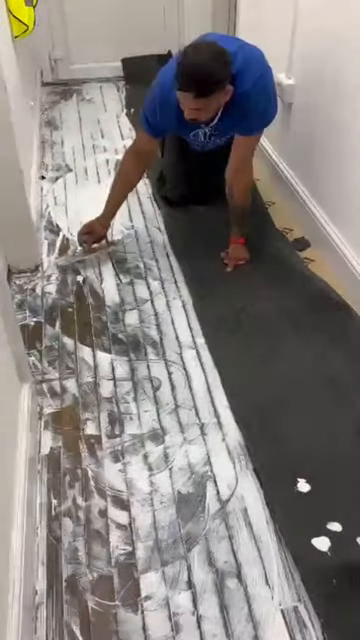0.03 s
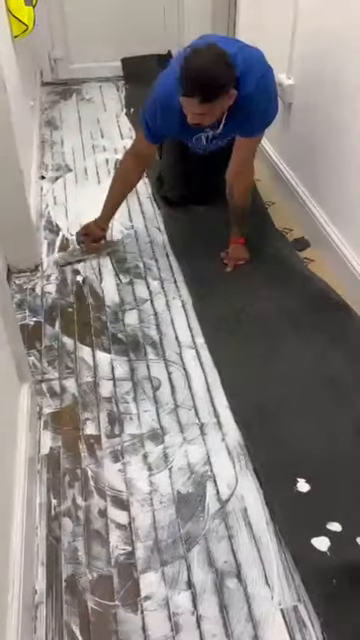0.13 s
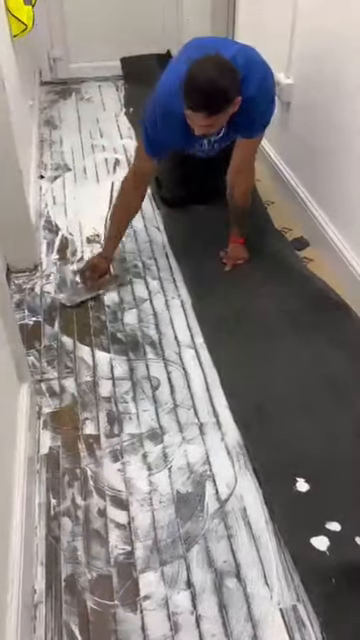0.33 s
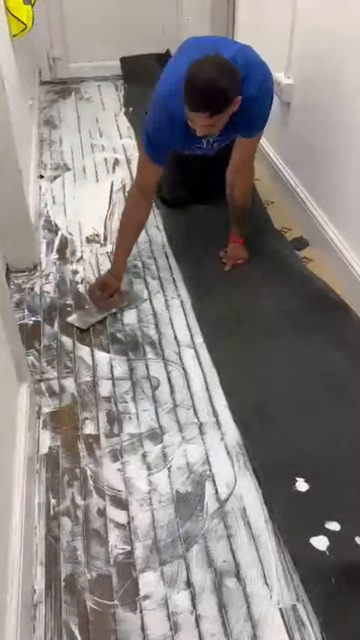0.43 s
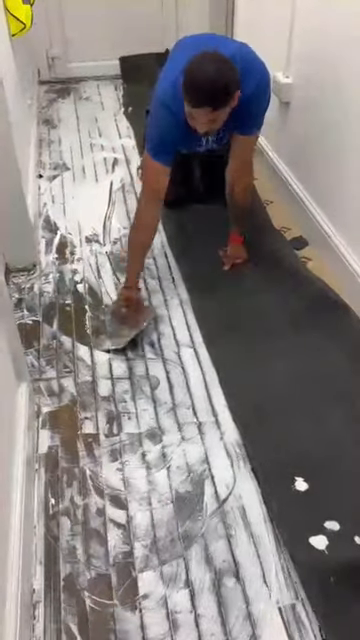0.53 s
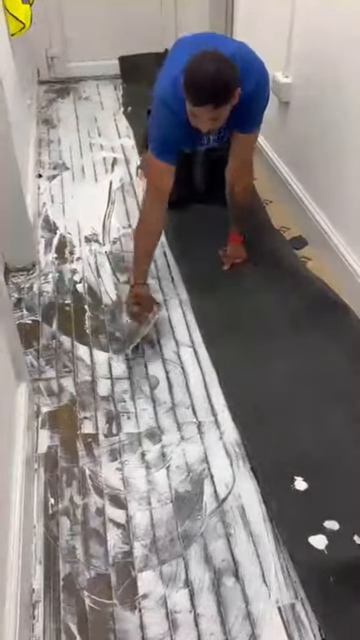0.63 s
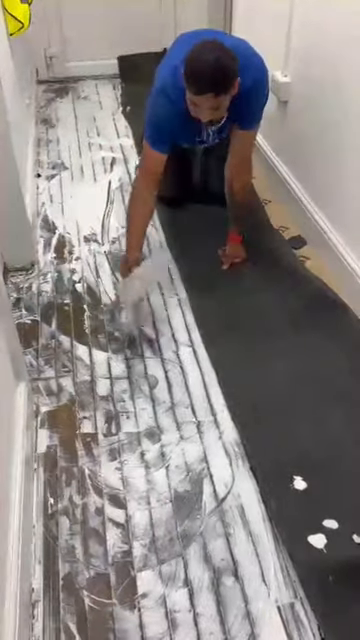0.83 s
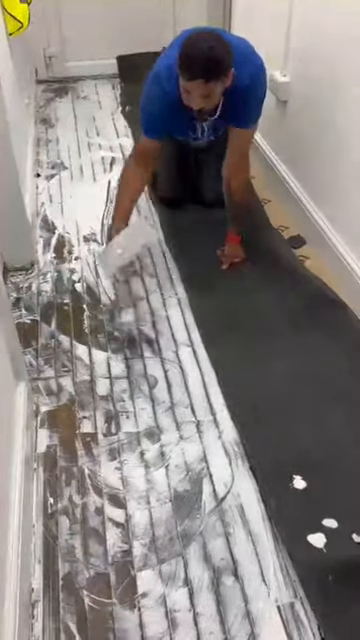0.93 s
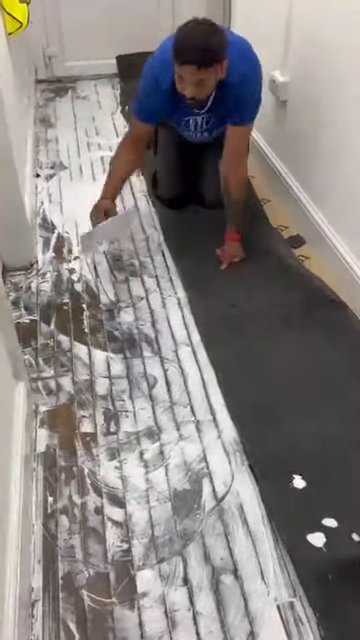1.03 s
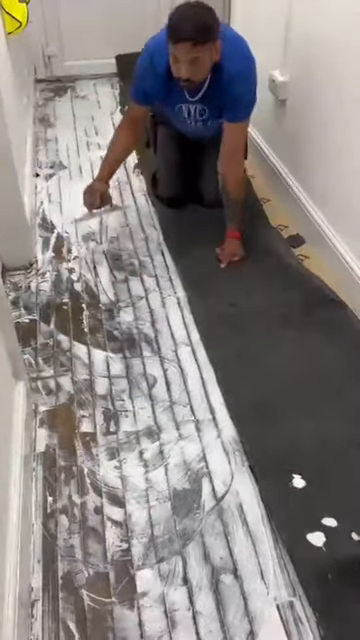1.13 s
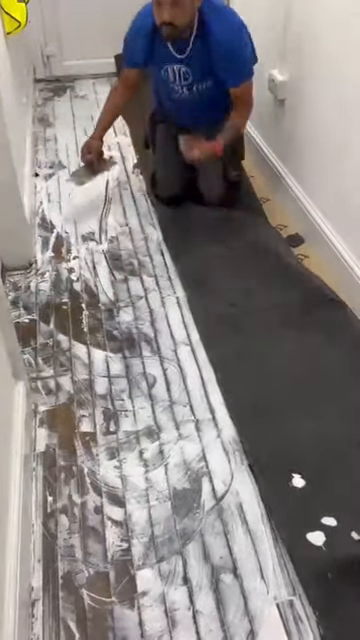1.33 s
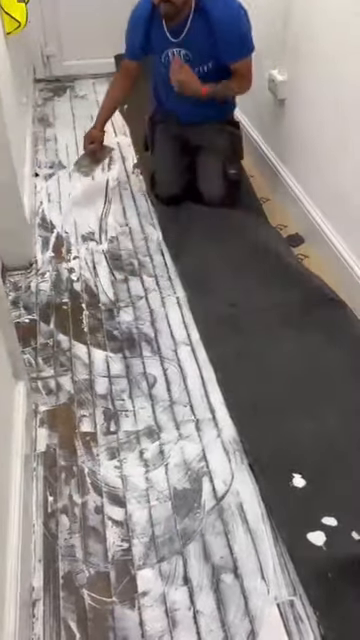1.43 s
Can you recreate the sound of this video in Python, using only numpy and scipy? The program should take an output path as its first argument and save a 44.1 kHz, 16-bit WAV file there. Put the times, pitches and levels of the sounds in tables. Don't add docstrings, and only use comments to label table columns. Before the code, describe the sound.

A steel trowel taps down with a soft thud, then drags in one rough, hissing scrape over sticky boards; afterwards quiet knocks and cloth rustle, in a small echoing corridor, heard close on a phone in stereo.

```python
import sys
import numpy as np
from scipy import signal
from scipy.fft import rfft, irfft, next_fast_len
from scipy.io import wavfile
from scipy.ndimage import uniform_filter1d, map_coordinates

SR = 44100
rng = np.random.default_rng(int(sys.argv[2]) if len(sys.argv) > 2 else 0)


def voltage_ratio(level):
    return 10 ** (np.asarray(level, float) / 20)


def pcm_store(signal):
    levels = np.round(np.clip(np.atleast_2d(signal), -1, 1) * 32767)
    wavfile.write(sys.argv[1], SR, levels.astype(np.int16).T)


N = 66150

# time in seconds, pressure in dB, extra hiss from speed in dB,
# drive of the boards in dB, ring of the blade in dB.
STROKE = [
    (0.292, -46, 0, 2.5, -37.5),
    (0.346, -37.5, 3.5, -5, 3),
    (0.38, -40, 7.5, 0, 0.5),
    (0.422, -38.5, -11.5, -2, 11),
    (0.473, -33.5, 5.5, 2, 0.5),
    (0.542, -34, 0.5, -1.5, 5),
    (0.579, -37, 8.5, 4, -24),
    (0.644, -32, 8, -9.5, 7.5),
    (0.718, -51.5, -8, 9.5, 5.5),
]
# pitch in Hz, width in Hz, level in dB.
BOARD_MODES = [(247, 82, -11), (306, 40, -3.5), (340, 31.7, -1.5), (570, 31, -1), (670.4, 47, 1),
               (790, 165, -5), (960, 69, -17), (1375, 170, -0.5), (1515, 139, -2), (2185, 320, -10)]
# frequency in Hz, level in dB per Hz.
SMEAR_SPECTRUM = [(300, -5.5), (800, 1.5), (2000, -5), (2900, -11), (5000, -9), (7000, -37), (9000, -53),
                  (11800, -53)]
# time in seconds, loss in dB, half length in seconds.
SKIPS = [
    (0.34, 5.5, 0.0035),
    (0.432, 2.5, 0.0091),
    (0.571, 9, 0.0047),
]
# start in seconds, level in dB, time to fade 60 dB in seconds,
# brightness from 0 to 1.
TICKS = [
    (0.2, -36.5, 0.047, 0.58),
    (0.21, -45, 0.0097, 1),
    (0.237, -42.5, 0.088, 0.52),
    (0.344, -37.5, 0.04, 0.2),
    (0.065, -53.5, 0.073, 1),
    (0.986, -56, 0.021, 0.3),
    (1.118, -69, 0.063, 0.7),
    (1.209, -42.5, 0.066, 0.35),
    (1.318, -49, 0.025, 0.1),
]
KNOCK_STARTS = [.205, .203, .246, .237, .237, .3455, .975, .97, 1.036, 1.04, 1.208, 1.317, 1.459, .262, .32,
                .431, .466, .489, .507, .535, .567, .568, .845, .9, 1.163, 1.185, 1.203, 1.305, 1.355,
                1.385, .97, .985, .345, .575]
# level in dB, pitch in Hz, rise in seconds,
# time to fade 60 dB in seconds.
KNOCKS = [(-25.5, 189.4, 0.0089, 0.17), (-30, 350, 0.0057, 0.11), (-16, 172.2, 0.0078, 0.11),
          (-27, 270, 0.0048, 0.14), (-35, 530, 0.00031, 0.049), (-19, 659, 0.0022, 0.037),
          (-34, 390, 0.014, 0.14), (-30.5, 330, 0.012, 0.097), (-31.5, 123, 0.0067, 0.14),
          (-34, 198, 0.0049, 0.12), (-48, 850, 0.0066, 0.049), (-45, 825, 0.0017, 0.058),
          (-35, 674, 0.0011, 0.023), (-22, 186, 0.0057, 0.095), (-24.5, 690, 0.0024, 0.033),
          (-18.5, 490, 0.0035, .04), (-16, 352.5, 0.0027, 0.062), (-29, 370, .003, 0.019),
          (-15, 296, 0.0023, 0.046), (-11.5, 640, 0.0014, 0.025), (-26.5, 290, .002, 0.02),
          (-16.5, 615, 0.0014, 0.016), (-39.5, 180, .012, 0.32), (-35.5, 169, 0.013, 0.25),
          (-34, 240, 0.0025, 0.094), (-33.5, 105, 0.0072, 0.13), (-35.5, 232, 0.0034, 0.15),
          (-37, 204, 0.0065, 0.096), (-38, 190, .005, 0.063), (-44, 270, 0.028, 0.42),
          (-47, 590, .004, .05), (-30, 163.4, 0.0094, 0.14), (-28, 190.6, 0.0063, .1),
          (-29, 198, 0.0068, 0.106)]
CATCH_TIMES = [.378, .44, .474, .46, .52, .525, .538, .61, .635, .645, .65, .655, .73, .72, .99, 1.125,
               1.215, .355, .648, .65, .445, 1.325, .075, .605, .705, .52, .375, .204, 1.03, 1.235, .44]
# level in dB, half length in seconds, pitch in Hz, width in Hz.
CATCHES = [(-50.5, 0.017, 5700, 1900), (-38.5, 0.028, 650, 76), (-29.5, 0.0047, 460, 37),
           (-63.5, 0.056, 9200, 1400), (-38, 0.023, 1330, 40), (-75, 0.0073, 4000, 3500),
           (-43, 0.013, 1760, 94), (-38.5, 0.029, 652, 30), (-33.5, 0.02, 985, 67),
           (-63, 0.0072, 3500, 3500), (-54, 0.019, 1950, 120), (-32.5, 0.015, 391, 60),
           (-56, 0.014, 315, 40), (-54.5, 0.056, 2400, 460), (-52.5, 0.018, 600, 190),
           (-63, 0.017, 3700, 230), (-58.5, 0.013, 3200, 1100), (-50, 0.047, 2270, 850),
           (-53, 0.011, 4700, 170), (-36.5, 0.0058, 2100, 100), (-44.5, .02, 1230, 680),
           (-70, 0.0072, 2700, 1600), (-62.5, 0.018, 3700, 3600), (-33.5, 0.027, 340, 26),
           (-37.5, 0.022, 340.6, 29), (-52, 0.042, 4900, 1100), (-52.5, 0.0091, 5150, 980),
           (-53, 0.0034, 3600, 2400), (-50, 0.032, 280, 92), (-60.5, .015, 3600, 800),
           (-40, 0.016, 354, 47)]
# time in seconds, level in dB.
SHUFFLE = [
    [(0, -53.5), (.06, -61.5), (.12, -64.5), (.19, -88)],
    [(.8, -64.5), (.95, -67), (1.12, -63), (1.18, -64), (1.22, -60), (1.33, -64.5), (1.4, -85.5),
     (1.5, -62.5)],
]
# frequency in Hz, level in dB per Hz.
CLOTH_SPECTRUM = [(200, 1.5), (500, 1.5), (1500, -11.5), (4000, -6.5), (8000, -25), (12000, -15.5)]
# pitch in Hz, width in Hz, level in dB.
SQUEAK = (2460, 640, -60)
# frequency in Hz, time to fade 60 dB in seconds.
CORRIDOR_FADE = [(150, 0.38), (500, 0.49), (2000, 0.39), (8000, 0.14)]
# frequency in Hz, level in dB per Hz.
AIR_SPECTRUM = [(20, -30), (40, -2), (70, 0), (220, -16), (450, -16), (1500, -23), (4500, -28.5),
                (11800, -46)]
# pitch in Hz, width in Hz, level in dB.
AIR_MODES = [(57, 20, -1), (125.6, 25.3, -1.5), (168.2, 23.3, -1.5), (227.7, 19.4, -0.5), (340.1, 8.7, 1.5),
             (682, 70, -14.5)]
# frequency in Hz, likeness from 0 to 1.
PORT_LIKENESS = [(120, .9995), (300, 1), (700, 0.76), (1500, 0.68), (3000, 0.33), (6000, 0.69), (8500, 1),
                 (11000, 0.55)]
# frequency in Hz, lag in radians.
PORT_LAG = [(0, 0), (200, 0), (450, .25), (1100, 1.2), (2500, 2.7), (3200, 3.1), (4900, 2.35), (6200, 3.3),
            (8100, 6.28), (10400, 9.4), (12000, 10)]
# frequency in Hz, left minus right in dB.
PORT_LEAN = [(150, 0), (340, 2.5), (700, 5), (1200, 5), (2000, 2.5), (3500, -1.5), (6300, -2), (9000, 0)]
# part (0 for mid, 1 for side), lower edge in Hz, upper edge in
# Hz.
LOST_BANDS = [(0, 5500, 6900), (0, 9450, 11050), (0, 11350, 11500), (0, 11700, 13000), (1, 7150, 9000),
              (1, 11500, 13000)]

SQUEAK_START_S = 1.44


def unit(x):
    return x / np.sqrt(np.mean(x ** 2) + 1e-20)


def along(points, hz):
    f, v = np.transpose(points)
    return np.interp(np.log(hz + 1), np.log(f + 1), v)


def wobble(rate):
    return map_coordinates(rng.standard_normal(200), [np.arange(N) * rate / SR])


def filtered(x, response):
    m = next_fast_len(N + SR // 2)
    return irfft(rfft(x, m) * response(np.fft.rfftfreq(m, 1 / SR)), m)[..., :N]


def resonant(x, peaks):
    def response(f):
        total = 0
        for k, (centre, width, db) in enumerate(peaks):
            damping = 1j * f * width
            total = total + (-1) ** k * voltage_ratio(db) * damping / (centre * centre - f * f + damping)
        return total
    return filtered(x, response)


def coloured(x, spectrum):
    return unit(filtered(x, lambda hz: voltage_ratio(along(spectrum, hz))))


def patchy(x, patchy_db):
    z = signal.stft(x, nperseg=512)[2]
    field = uniform_filter1d(rng.standard_normal(z.shape), size=5, axis=0)
    field = uniform_filter1d(field, size=8, axis=1)
    return signal.istft(z * voltage_ratio(patchy_db * unit(field)), nperseg=512)[1][:N]


def blade_slips():
    slips_per_s, spread_db = 1500, 2
    chance, sign, size = rng.random((3, N))
    slips = (chance < slips_per_s / SR) * np.sign(sign - .5)
    slips = slips * voltage_ratio(-spread_db * np.log(size + 0.012))
    return unit(slips) + 0.74 * rng.standard_normal(N)


def trowel():
    s, press_db, speed_db, board_db, ring_db = np.transpose(STROKE)
    t = np.arange(N) / SR
    lift_s, clump_db, blade_db, hiss_db = 0.27, 2, -2, -8

    def held(v):
        return np.interp(t, s, v)

    away_s = np.abs(t - np.clip(t, s[0], s[-1]))
    touch = voltage_ratio(held(press_db) - 60 * away_s / lift_s)
    for at, loss_db, half in SKIPS:
        touch = touch * voltage_ratio(-loss_db * np.exp(-.5 * ((t - at) / half) ** 2))

    slips = blade_slips()

    def rung(rate, modes):
        return unit(resonant(slips * voltage_ratio(clump_db * wobble(rate)), modes))

    low = rung(56.56, BOARD_MODES[:3]) * voltage_ratio(held(board_db))
    mid = patchy(rung(71.0, BOARD_MODES[3:6]) * voltage_ratio(blade_db), patchy_db=1.5)
    ring = patchy(rung(79.2, BOARD_MODES[6:]), patchy_db=3.5)
    ring = ring * voltage_ratio(blade_db - 9.0 + held(ring_db))

    hiss = patchy(rng.standard_normal(N) + 0.16 * slips, patchy_db=3.5)
    hiss = coloured(hiss * voltage_ratio(3.1 * wobble(46.32)), SMEAR_SPECTRUM)
    hiss = hiss * voltage_ratio(hiss_db + held(speed_db))
    return touch * (low + mid + ring + hiss)


def ticks():
    out, t = np.zeros(N + SR), np.arange(SR // 4) / SR
    for s, db, t60, bright in TICKS:
        puff = rng.standard_normal(len(t))
        puff = bright * puff + (1 - bright) * 2 * uniform_filter1d(puff, size=9)
        out[round(s * SR):][:len(t)] += voltage_ratio(db - 60 * t / t60) * puff
    return out[:N]


def knocks():
    out, t = np.zeros(N + SR), np.arange(SR // 4) / SR
    for s, (db, hz, rise, t60) in zip(KNOCK_STARTS, KNOCKS):
        sway = 1 + 0.02 * np.sin(2 * np.pi * (25 * t + rng.random()))
        tone = np.sin(2 * np.pi * hz * np.cumsum(sway) / SR)
        envelope = voltage_ratio(db - 60 * t / t60) * (1 - np.exp(-t / rise)) ** 2
        out[round(s * SR):][:len(t)] += envelope * tone
    return out[:N]


def catches():
    t, out = np.arange(N) / SR, np.zeros(N)
    for s, (db, half, hz, width) in zip(CATCH_TIMES, CATCHES):
        swell = np.exp(-.5 * ((t - s) / half) ** 2)
        rub = unit(swell * resonant(rng.standard_normal(N), [(hz, width, 0)]))
        out += voltage_ratio(db) * rub * np.sqrt(np.mean(swell ** 2))
    return out


def shuffle():
    t, level = np.arange(N) / SR, np.zeros(N)
    for rows in SHUFFLE:
        s, db = np.transpose(rows)
        level += voltage_ratio(np.interp(t, s, db, left=-120, right=-120))
    rustle = patchy(rng.standard_normal(N), patchy_db=4.0) * voltage_ratio(3.1 * wobble(30.5))
    return voltage_ratio(7.5) * level * coloured(rustle, CLOTH_SPECTRUM)


def squeak():
    hz, width, db = SQUEAK
    once = resonant(rng.standard_normal(N), [(hz, width, 0)])
    twice = unit(resonant(once, [(hz, width, 0)]))
    return voltage_ratio(db) * (np.arange(N) / SR > SQUEAK_START_S) * twice


def corridor(x):
    wall_s = .006
    hz, t, z = signal.stft(rng.standard_normal((2, SR // 2)), SR, nperseg=256)
    fade = voltage_ratio(-60 * t / along(CORRIDOR_FADE, hz)[:, None])
    tail = signal.istft(z * fade, SR, nperseg=256)[1]
    delayed = np.pad(x, (round(wall_s * SR), 0))[None]
    return signal.fftconvolve(delayed, tail / np.linalg.norm(tail[0]), axes=1)[:, :N]


def air():
    air_db, hum_db = -53, -47
    hush = coloured(rng.standard_normal((2, N)), AIR_SPECTRUM) * voltage_ratio(air_db + 1.2 * wobble(5.7))
    hum = unit(resonant(rng.standard_normal((2, N)), AIR_MODES)) * voltage_ratio(hum_db + 0.51 * wobble(8.15))
    return hush + hum


def ports(pair):
    def blend(hz):
        turn = np.arccos(np.clip(along(PORT_LIKENESS, hz), -1, 1)) / 2
        return np.array([np.cos(turn), np.sin(turn)])

    def lean_and_lag(hz):
        lag = np.interp(hz, *np.transpose(PORT_LAG))
        left = voltage_ratio(along(PORT_LEAN, hz) / 2) * np.exp(-.5j * lag)
        return np.array([left, 1 / left])

    shared, stray = filtered(pair, blend)
    return filtered(np.array([shared + stray, shared - stray]), lean_and_lag)


def scene():
    rubs = trowel() + shuffle() + squeak()
    hits = ticks() + knocks() + catches()
    wet = corridor(rubs + voltage_ratio(-5) * hits)
    spread = np.roll(hits, shift=40) * voltage_ratio(-1.5)
    shared = rubs + hits + voltage_ratio(-6) * wet[0]
    stray = voltage_ratio(1.0) * wet[1] + spread
    return ports(np.array([shared, stray]) + air())


def lose_bands(z, hz, t):
    column = hz[:, None]
    steady = (t < .19) | (t > .222)
    late = t > SQUEAK_START_S

    def step(v):
        return np.repeat(v, 3, axis=-1)[..., :len(t)]

    def band(low, high):
        return (column > low) & (column < high)

    loud_db = 10 * np.log10(np.mean(np.abs(z[:, hz > 2000]) ** 2, axis=(0, 1)) + 1e-20)
    narrow = 8 * (loud_db - loud_db.mean())
    keep = np.ones(z.shape)
    for part, low, high in LOST_BANDS:
        a, b = 160 * rng.standard_normal((2, len(t)))
        keep[part] *= 1 - steady * band(low + step(a) + narrow, high + step(b) - narrow)

    sparse = step(rng.random(len(t)) < .55)
    keep[0] *= 1 - steady * sparse * band(10500, 12200)

    keep[0][:, late] = np.maximum(keep[0][:, late], band(5900, 6550))
    keep[0] *= 1 - late * band(2950, 3300)
    keep *= column < 11970

    holes = step(np.repeat(rng.random(z.shape[1:]) < .17, 4, axis=0)[:len(hz)])
    keep[0] *= 1 - steady * holes * band(2400, 5600)
    return keep


def low_pass(x):
    return signal.sosfilt(signal.butter(12, 11970, fs=SR, output="sos"), x)


def record(dry):
    mid_side = np.array([dry[0] + dry[1], dry[0] - dry[1]]) / 2
    hz, t, z = signal.stft(mid_side, SR, nperseg=1024)
    kept = z * lose_bands(z, hz, t)
    mid, side = signal.istft(kept, SR, nperseg=1024)[1][:, :N]
    return low_pass(np.array([mid + side, mid - side]))


dry = scene()
out = record(dry)
pcm_store(out)
```